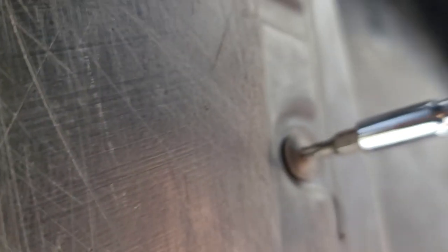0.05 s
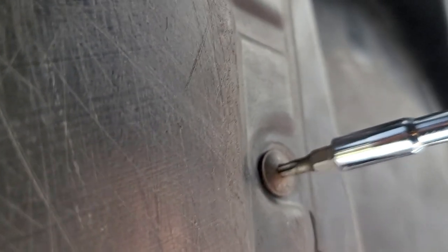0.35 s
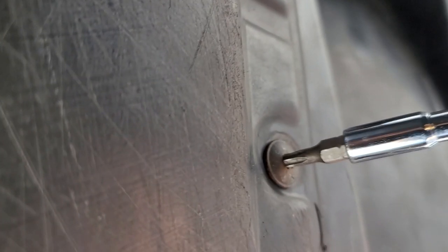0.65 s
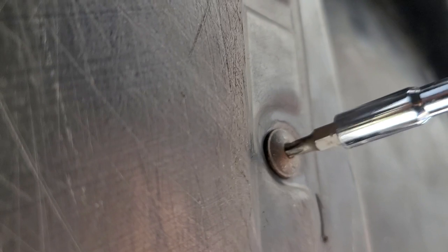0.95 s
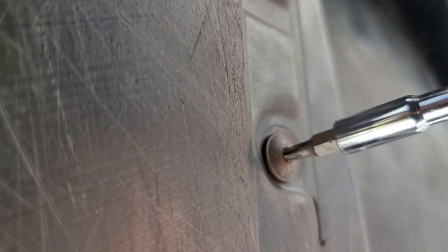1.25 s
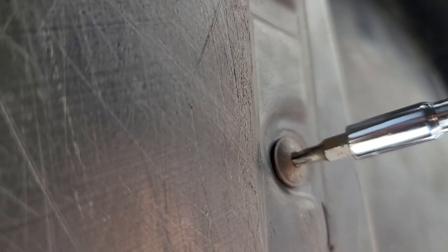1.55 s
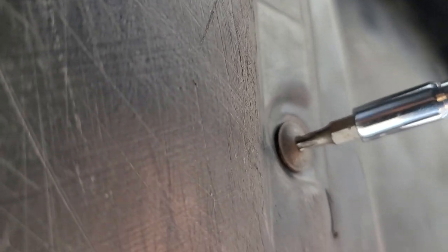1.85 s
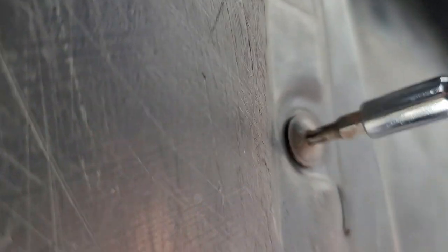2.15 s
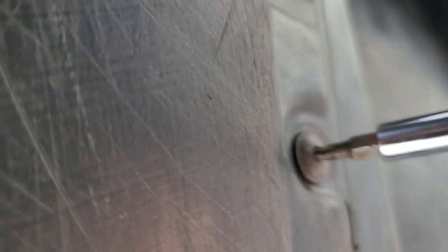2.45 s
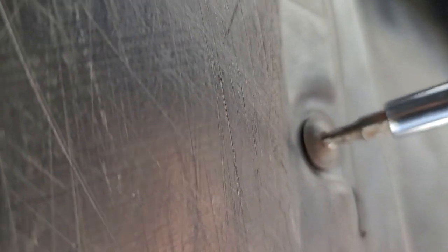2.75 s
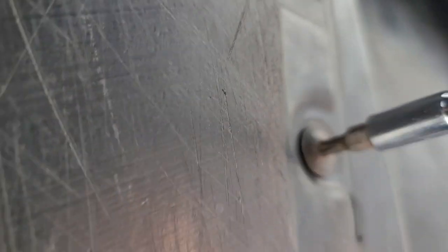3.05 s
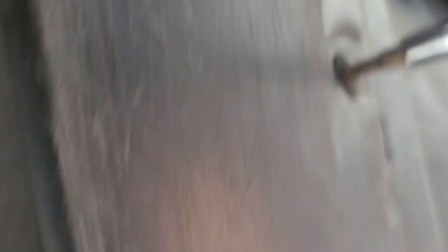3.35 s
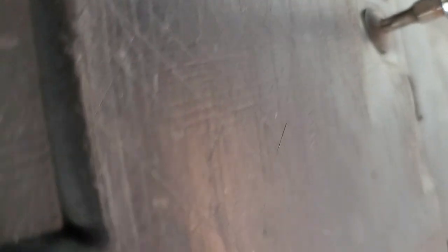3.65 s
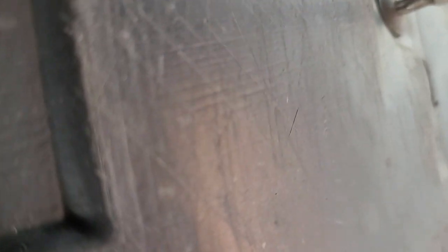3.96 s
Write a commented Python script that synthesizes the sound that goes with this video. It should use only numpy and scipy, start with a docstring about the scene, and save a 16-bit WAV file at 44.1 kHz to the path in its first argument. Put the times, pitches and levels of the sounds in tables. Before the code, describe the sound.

A ratchet bit taps and knocks against a car's underbody screw, with two sharp snaps.

```python
"""Light taps and hard metal knocks, close by: a ratchet's screwdriver bit on a screw in a car's underbody.
The bit rocks the screw and rings the damped panel; midway the ratchet snaps twice and the bit slips.
A sleeve rubs as the arm moves, and the hand softly bumps the microphone it holds.
Nearby metal returns quick echoes. A low rumble and a thin hiss lie underneath."""
import sys
import numpy as np
from scipy import signal
from scipy.fft import irfft
from scipy.io import wavfile
from scipy.ndimage import uniform_filter1d, minimum_filter1d

SR = 44100
rng = np.random.default_rng(int(sys.argv[2]) if len(sys.argv) > 2 else 0)


def store_pcm(level_fs):
    """Save levels as 16-bit WAV."""
    pcm = np.round(np.clip(level_fs, -1, 1) * 32767).astype(np.int16)
    wavfile.write(sys.argv[1], SR, np.atleast_2d(pcm).T)


N = 176400
RING_T_S = np.arange(SR // 2) / SR  # time axis of one strike


def amp(db):
    """Decibels to gain."""
    return 10 ** (np.asarray(db) / 20)


def pan(db):
    """Left and right gains for an L-R level difference."""
    return amp(np.array([[db], [-db]]) / 2)


def add(out, start_s, sound):
    """Mix a sound in at start_s."""
    i = int(start_s * SR)
    out[:, i:i + sound.shape[1]] += sound[:, :N - i]


def envelope(points):
    """Gain curve through (t/s, level/dB) points."""
    return amp(np.interp(np.arange(N) / SR, *np.array(points).T))


def wander(rate_hz):
    """Smooth random drift, spread near 1."""
    hold = int(SR / rate_hz)
    steps = np.repeat(rng.standard_normal(N // hold + 1), hold)
    return np.sqrt(2) * uniform_filter1d(steps, hold)[:N]


def decay(t60_s):
    """Exponential decay of one strike."""
    return np.exp(-np.log(1000) * RING_T_S / t60_s)


def noise(spectrum, size=N, wide_hz=453):
    """Coloured stereo noise, unit RMS; left and right are alike below wide_hz and diverge above."""
    hz = np.maximum(np.fft.rfftfreq(size, 1 / SR), 1)
    points_hz, db = np.array(spectrum).T
    colour = amp(np.interp(np.log(hz), np.log(points_hz), db))
    mid, side = np.exp(2j * np.pi * rng.random((2, len(hz))))
    stereo = mid + np.array([[1], [-1]]) * side * np.sqrt(hz / (hz + wide_hz))
    x = irfft(stereo * colour, size)
    return x / x.std()


def burst(spectrum, t60_s):
    """Many close modes struck at once and dying together, as decaying noise."""
    return noise(spectrum, len(RING_T_S)) * decay(t60_s)


def ring(modes, left_lag_s=0.00031):
    """Struck modes, their phase lagging at the left microphone."""
    heard_s = RING_T_S + np.array([[-left_lag_s], [left_lag_s]]) / 2
    out = np.zeros_like(heard_s)
    for hz, db, t60_s in modes:
        onset = 1 - np.exp(-(2 * np.pi * hz * RING_T_S) ** 2)
        out += amp(db) * onset * decay(t60_s) * np.sin(2 * np.pi * hz * heard_s)
    return out


# noise spectra: f/Hz, level/dB
RUMBLE_SPECTRUM = [(20, -30.5), (40, -5), (70, 0.5), (110, -8), (170, -15.5), (300, -22.5), (500, -35),
                   (1000, -32.5), (2500, -42.5), (4500, -76), (9000, -60), (16000, -58.5)]
HISS_SPECTRUM = [(4200, -63), (5100, -7.5), (5550, 11.5), (6100, 5), (6800, 0), (8000, -43), (11000, -48)]
# hiss swell: t/s, level/dB
HISS_SWELL = [(0, 1), (.85, 0), (1.0, -2.5), (2.8, 0), (3.1, -7.5), (3.499, -3.5), (4, -1.5)]

def background():
    """A wavering low rumble and a thin band of hiss."""
    rumble = amp(-44.5 + 1.25 * wander(rate_hz=20)) * noise(RUMBLE_SPECTRUM)
    hiss = amp(-60.5) * envelope(HISS_SWELL) * noise(HISS_SPECTRUM)
    return rumble + hiss


# hand bumps: t/s, level/dB
BUMPS = [(1.503, -25.5), (1.531, -23), (1.583, -22), (2.192, -23.5), (2.419, -15.5)]

def hand_bumps():
    """The hand bumps the microphone: soft, low thumps."""
    out = np.zeros((2, N))
    for start_s, db in BUMPS:
        add(out, start_s, ring([(49, db, 0.13)]))
    return out


# cloth spectra, body and treble: f/Hz, level/dB
RUB_SPECTRUM = [(60, -22), (110, -2.5), (200, -2.5), (300, -3.5), (400, 6), (600, -10), (1100, -11),
                (1320, -7.5), (1550, -12), (2000, -13), (3000, -10.5), (5000, -20), (7000, -24.5),
                (16000, -45.5)]
SWISH_SPECTRUM = [(1500, 5), (4000, 6.5), (6800, 8.5), (9000, 2.5), (11500, 3), (16000, -4.5)]
# arm strokes, body and treble: t/s, level/dB
RUB_STROKES = [(0, -66), (.2, -51), (.33, -57.5), (.45, -75), (.88, -58), (1.03, -48), (1.13, -55),
               (1.24, -65), (1.49, -42), (1.72, -39.5), (1.85, -45.5), (2.0, -42.5), (2.16, -58),
               (2.3, -59.5), (2.38, -53.5), (2.53, -49.5), (2.68, -49), (2.77, -57.5), (2.91, -52.5),
               (3.05, -53), (3.16, -66.5), (3.35, -54), (3.57, -51.5), (3.76, -67.5), (3.9, -54.5),
               (4, -60)]
SWISH_STROKES = [(0, -65.5), (.2, -57), (.42, -67), (.9, -71.5), (1.08, -69.5), (1.25, -65.5), (1.5, -49),
                 (1.75, -45.5), (1.85, -54), (2.02, -42.5), (2.16, -60), (2.32, -55.5), (2.38, -60),
                 (2.53, -44.5), (2.7, -55.5), (2.76, -65.5), (2.93, -42), (3.04, -65), (3.22, -62.5),
                 (3.42, -58.5), (3.58, -48), (3.64, -59.5), (3.78, -68), (3.9, -58), (4, -61.5)]

def sleeve():
    """Cloth slides in grainy strokes as the arm moves."""
    grain = amp(0.75 * wander(rate_hz=59.95))
    rub = envelope(RUB_STROKES) * noise(RUB_SPECTRUM)
    swish = envelope(SWISH_STROKES) * noise(SWISH_SPECTRUM)
    return grain * (rub + swish)


# tinks: t/s, level/dB
TINKS = [(3.836, -46.5)]
# bit modes: f/Hz, level/dB, T60/s
BIT_MODES = [(1934, 9.5, 0.08), (2180, -9, 0.078), (3800, -5, 0.071)]

def tool_tink():
    """Small steel parts of the tool touch and ring faintly."""
    out = np.zeros((2, N))
    for start_s, db in TINKS:
        add(out, start_s, amp(db) * ring(BIT_MODES))
    return out


# slips: t/s, level/dB, pan L-R/dB
SLIPS = [(2.3657, -20, -7.5)]
# slip spectrum: f/Hz, level/dB
SLIP_SPECTRUM = [(150, 4), (400, 0), (750, -2), (1900, -0.5), (2800, -13), (4500, -22), (7000, -24),
                 (16000, -62)]

def bit_slip():
    """The bit slips in the screw head with a dry tick."""
    out = np.zeros((2, N))
    for start_s, db, pan_db in SLIPS:
        tick = burst(SLIP_SPECTRUM, t60_s=0.01)
        tail = amp(-16) * burst(SLIP_SPECTRUM, t60_s=0.024)
        add(out, start_s, pan(pan_db) * amp(db) * (tick + tail))
    return out


# snaps: t/s, crack/dB, ring/dB, thud/dB, pan L-R/dB
SNAPS = [(2.0337, -6, -18.5, -25, 3.5), (2.0936, -7, -23.5, -25.5, 3)]
# struck steel spectrum: f/Hz, level/dB
STEEL_SPECTRUM = [(200, -2.5), (550, -7), (950, -1), (1500, -3), (2200, -2.5), (2700, -10.5), (3500, -12.5),
                  (4400, -5.5), (5100, 1), (5900, -4.5), (6800, 3), (7800, -7), (9300, -8.5), (10500, -1.5),
                  (12500, -11), (15500, -18)]
# socket modes: f/Hz, level/dB, T60/s
SOCKET_MODES = [(1686, -1.5, .05), (2370, 3.5, 0.031), (3800, 7, 0.045), (5500, -6, 0.079),
                (4880, 1, 0.055), (5950, -17, 0.032), (7200, -28.5, 0.044), (7420, -5, 0.14),
                (7800, -1, 0.042), (9313, -13, .04), (10350, 5.5, .05), (11020, -8, .06), (14400, -15, .05)]
CRACK_T60_S = 0.013

def ratchet_snaps():
    """Steel snaps ring the socket and jolt the panel."""
    out = np.zeros((2, N))
    for start_s, crack_db, ring_db, thud_db, pan_db in SNAPS:
        tail = burst(STEEL_SPECTRUM, t60_s=0.072) + amp(-13.5) * ring(SOCKET_MODES)
        steel = amp(crack_db) * burst(STEEL_SPECTRUM, CRACK_T60_S) + amp(ring_db) * tail
        thud = ring([(109.7, thud_db, 0.14)])
        add(out, start_s, pan(pan_db) * steel + thud)
    return out


# panel clatter spectrum: f/Hz, level/dB
CLATTER_SPECTRUM = [(100, 7), (300, -6.5), (520, 3.5), (750, 5), (1100, 1.5), (1500, -12.5), (2200, -10.5),
                    (3500, -22), (7000, -30.5), (9000, -38), (16000, -57)]
# modes: f/Hz, level/dB, T60/s
PANEL_MODES = [(322, -6, 0.14), (414, -1.5, 0.083), (533, -25, 0.072), (662.3, 8, 0.073),
               (758, -48.5, 0.026), (896, -9, 0.12), (1051, 1.5, 0.039), (1215, -5.5, 0.029),
               (1249, -10, 0.094), (1436, -29, 0.1036), (1496, -10.5, 0.097), (1954, -15, 0.061)]
BLOW_MODES = [(374, -13, 0.033), (552, -6, 0.013), (765, 1.5, 0.022), (1044.3, -4, 0.062),
              (1880, -18.5, .015)]  # heavily damped panel around the screw
SCREW_MODES = [(1090, -3.5, 0.026), (1226, -11, .035)]  # screw rocking in its hole

def struck_panel(clatter_db, ring_db, blow_db, screw_db):
    """One hit: the damped panel clatters and rings, and the screw rocks."""
    clatter = burst(CLATTER_SPECTRUM, t60_s=0.094)
    tail = amp(-19.5) * burst(CLATTER_SPECTRUM, t60_s=0.24)  # space under the car
    panel = amp(ring_db) * ring(PANEL_MODES) + amp(blow_db) * ring(BLOW_MODES)
    screw = amp(screw_db) * ring(SCREW_MODES)
    return amp(clatter_db) * (clatter + tail) + panel + screw


# taps: t/s, level/dB, thud/dB, thud f/Hz, pan L-R/dB
TAPS = [(0.341, -44.5, -37, 201, 11.5), (0.5146, -36, -25, 168.3, 6), (0.603, -49, -40.5, 197, 6),
        (0.667, -40, -29, 171, 7), (0.681, -37.5, -31, 210, 3.5), (0.786, -47.5, -42, 118.7, 6),
        (2.373, -58, -27.5, 238, 10), (2.731, -49, -35.5, 176, 12), (3.063, -36.5, -45, 130, 3),
        (3.152, -49, -41, 141, 7), (3.321, -47, -35.5, 247, 10.5), (3.37, -42.5, -33.5, 257, 7.5),
        (3.606, -47.5, -42.5, 259, 11), (3.891, -54, -40.5, 201, 1)]

def bit_taps(thud_lag_s=0.0032, thud_t60_s=0.089):
    """The bit seeks the screw head: each light tap rings the panel faintly, then thuds."""
    out = np.zeros((2, N))
    for start_s, db, thud_db, thud_hz, pan_db in TAPS:
        body = struck_panel(clatter_db=-5.5, ring_db=-10, blow_db=-8, screw_db=-7.5)
        thud = ring([(thud_hz, thud_db, thud_t60_s)], left_lag_s=0.00051)
        add(out, start_s, pan(pan_db) * amp(db) * body)
        add(out, start_s + thud_lag_s, pan(pan_db) * thud)
    return out


# knocks: t/s, clatter/dB, ring/dB, blow/dB, screw/dB, boom/dB, tick/dB, steel/dB, pan L-R/dB
KNOCKS = [(0.8979, -13.5, -20.5, -9, -16, -33, -20, -45, -0.5),
          (0.9006, -15, -24, -9.5, -12, -15, -33, -39, 1.5),
          (0.9101, -24.5, -39, -8, -11, -21, -50, -61.5, -4),
          (2.9531, -13.5, -20, -13, -10, -16.5, -40, -45, -5.5),
          (2.9963, -14.5, -20, -5.5, -6.5, -15.5, -21, -26, 0)]
# contact tick spectrum: f/Hz, level/dB
TICK_SPECTRUM = [(300, -38), (1200, 7), (3000, -4), (4500, -5), (6800, -3.5), (8500, -37.5), (16000, -6)]
# low panel modes: f/Hz, level/dB, T60/s
BOOM_MODES = [(58.7, 5.5, 0.239), (72, 3, 0.17), (100.25, -0.5, 0.23), (133.6, -1.5, 0.24),
              (165, -1, 0.135), (200, -12, 0.16)]

def bit_knocks(boom_lag_s=0.0036):
    """The bit hits hard: the contact ticks, the panel rings, and its low modes boom just after."""
    out = np.zeros((2, N))
    for start_s, clatter_db, ring_db, blow_db, screw_db, boom_db, tick_db, steel_db, pan_db in KNOCKS:
        body = struck_panel(clatter_db, ring_db, blow_db, screw_db)
        tick = amp(tick_db) * burst(TICK_SPECTRUM, t60_s=0.022)
        crack = amp(steel_db) * burst(STEEL_SPECTRUM, CRACK_T60_S)
        add(out, start_s, pan(pan_db) * (body + tick + crack))
        add(out, start_s + boom_lag_s, amp(boom_db) * ring(BOOM_MODES))
    return out


# echoes: left lag/s, right lag/s, level/dB
ECHOES = [(.0014, 0.0062, -16), (.0036, 0.0034, -17), (.0068, .0059, -22), (0.0101, .0089, -16.5)]

def with_echoes(direct):
    """Nearby metal adds quick reflections, timed differently left and right."""
    out = direct.copy()
    for left_s, right_s, db in ECHOES:
        for channel, lag_s in enumerate((left_s, right_s)):
            lag = int(SR * lag_s) + 1
            out[channel, lag:] += amp(db) * direct[channel, :-lag]
    return out


def scene():
    """Tool and handling sounds with their echoes, over the background."""
    tool = bit_knocks() + bit_taps() + ratchet_snaps() + bit_slip() + tool_tink()
    return with_echoes(tool + sleeve() + hand_bumps()) + background()


def record(dry):
    """Low cut, fast peak limiter, high cut."""
    low_cut_hz, high_cut_hz = 25, 16100
    limit_db, limit_window_s = 1.5, 0.00067
    low_cut = signal.butter(2, low_cut_hz, "high", fs=SR, output="sos")
    high_cut = signal.ellip(8, .2, 70, high_cut_hz, fs=SR, output="sos")
    x = signal.sosfilt(low_cut, dry)
    span = int(limit_window_s * SR) + 1
    max_gain = np.minimum(1, amp(limit_db) / (np.abs(x) + 1e-9))
    gain = uniform_filter1d(minimum_filter1d(max_gain, span, axis=1), span, axis=1)
    return signal.sosfilt(high_cut, x * gain)


dry = scene()
out = record(dry)
store_pcm(out)
```